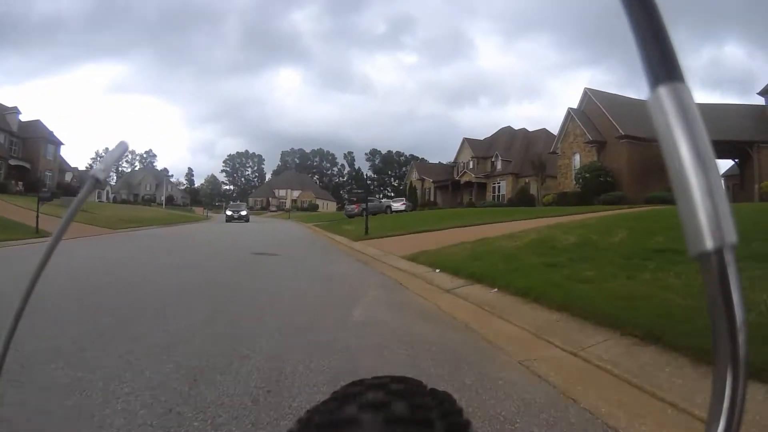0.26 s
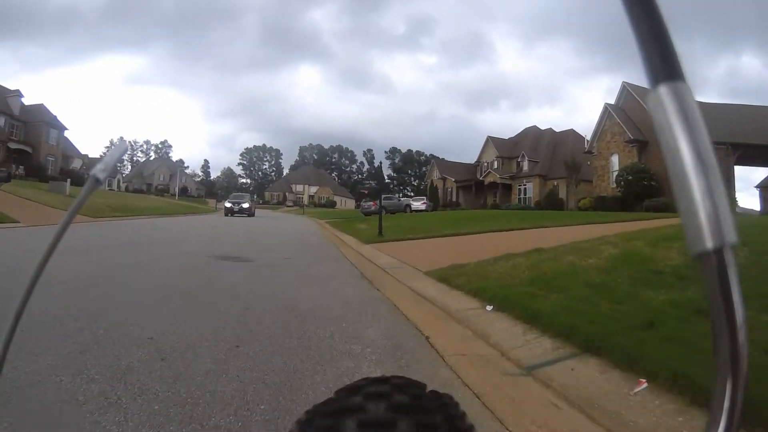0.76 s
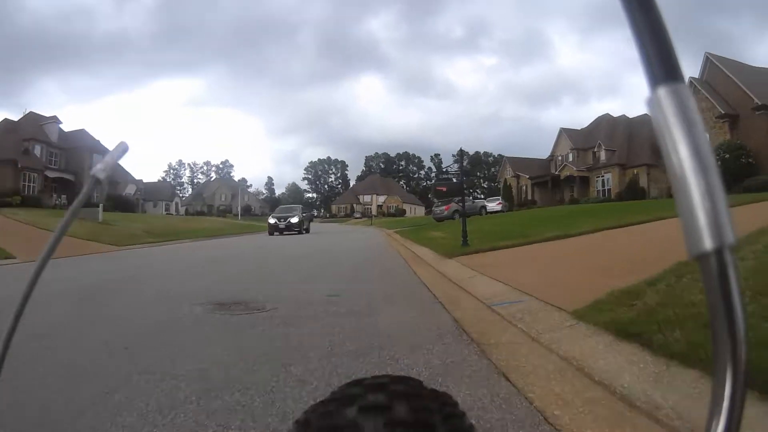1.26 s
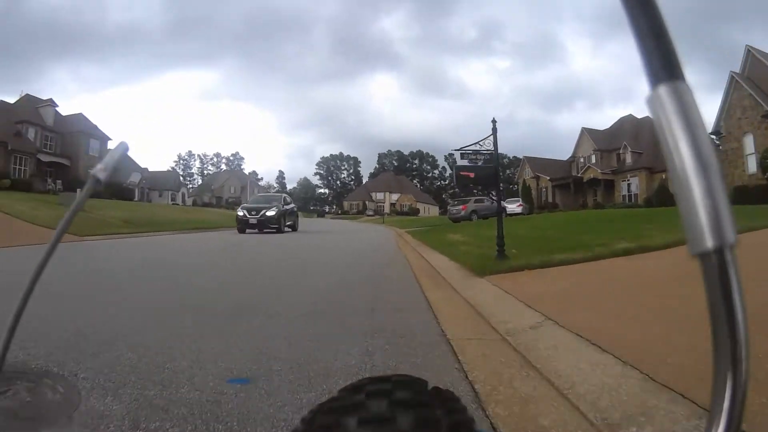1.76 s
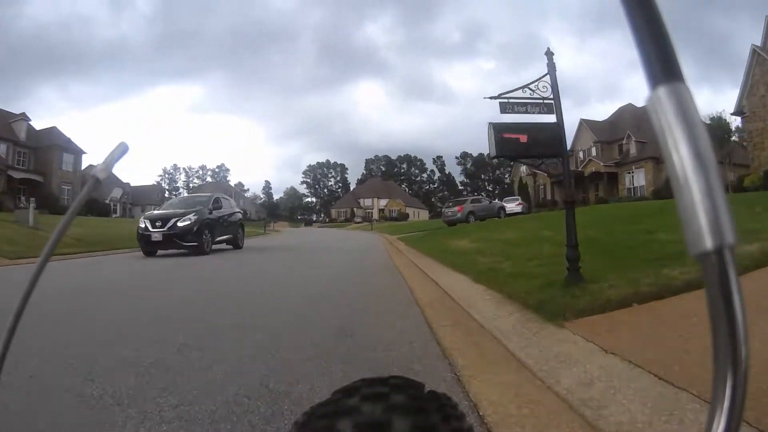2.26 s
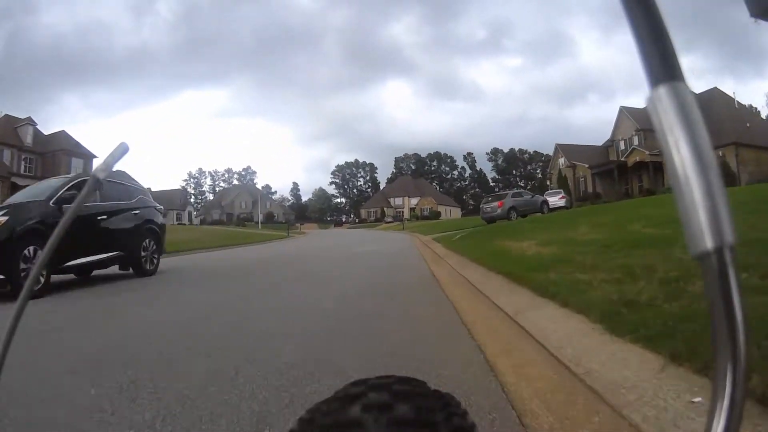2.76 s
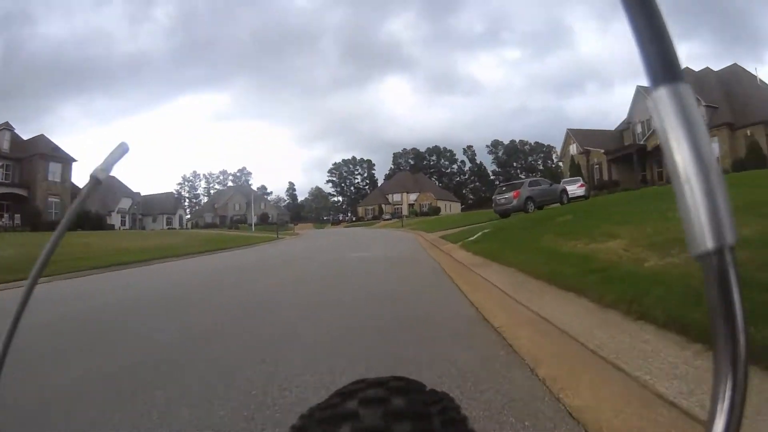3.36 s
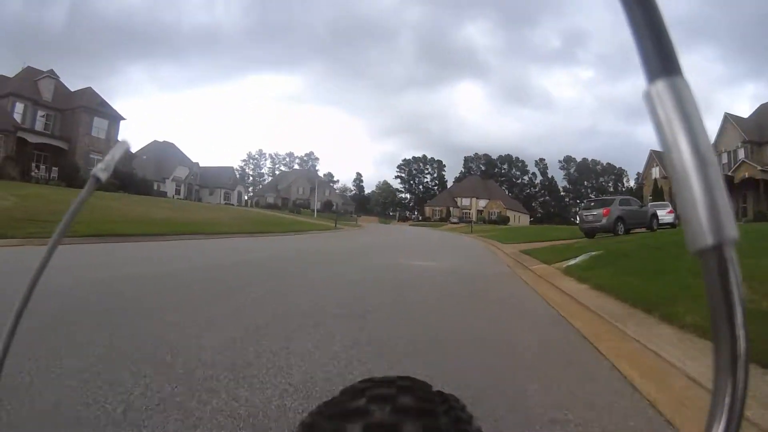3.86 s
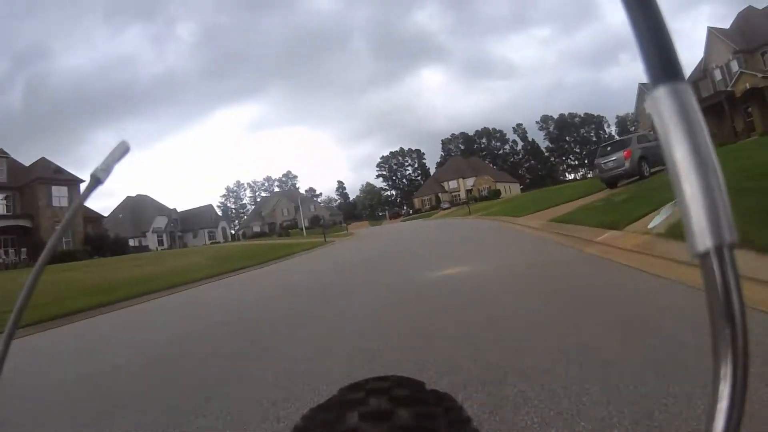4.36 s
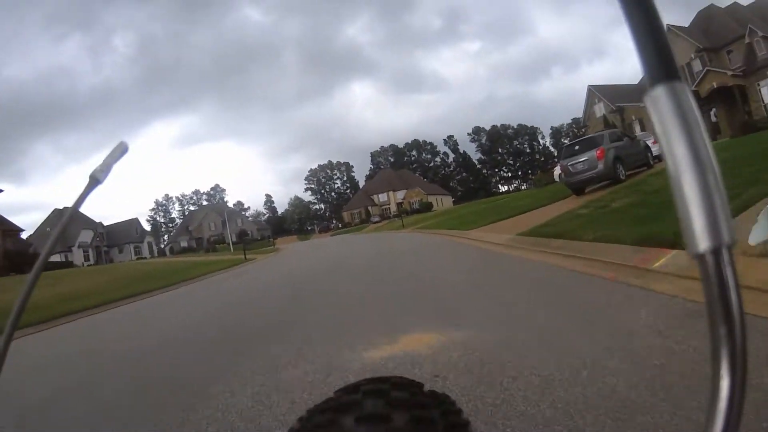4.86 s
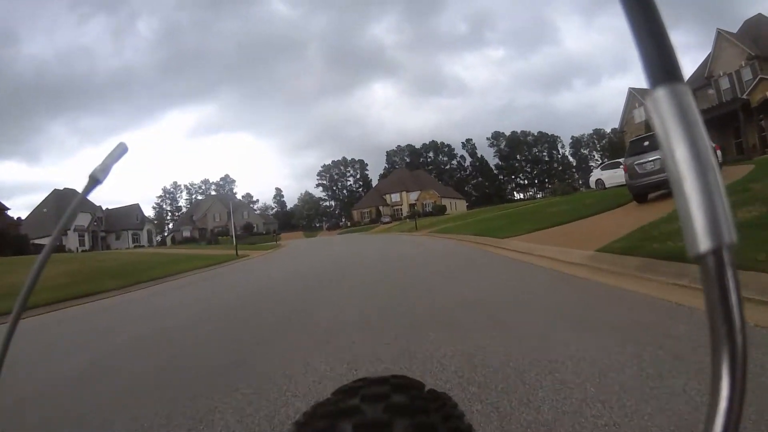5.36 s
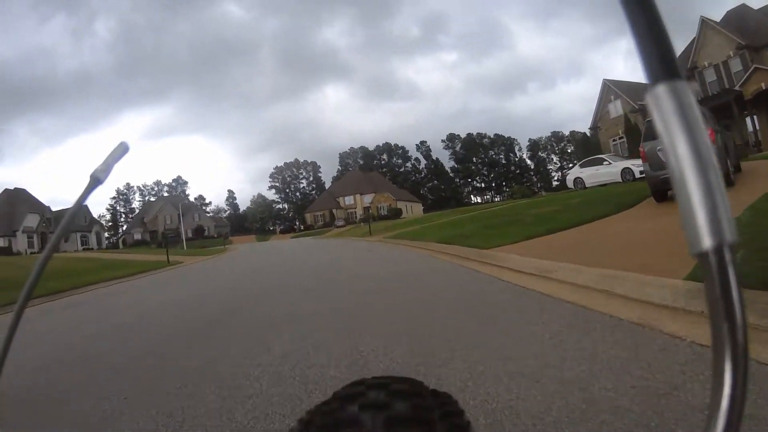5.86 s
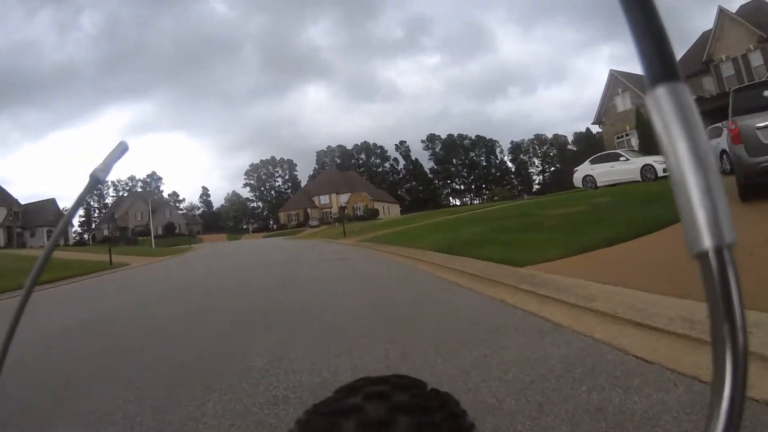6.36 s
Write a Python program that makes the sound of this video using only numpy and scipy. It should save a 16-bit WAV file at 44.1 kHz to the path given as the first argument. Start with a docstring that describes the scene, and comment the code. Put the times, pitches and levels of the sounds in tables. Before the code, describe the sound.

Outdoor ride heard from a bike-mounted microphone: buzzing tread hum that rises slightly with pedal pushes, grainy asphalt roar with fine hiss, and tiny metallic clinks about every 0.4 seconds. Light frame taps come just after two seconds, a passing car adds a brief airy swell, and later come wind buffets, two strong clacks and fading tyre noise.

```python
"""Bicycle with knobbly tyres on a suburban street

The microphone sits above the front wheel. Tread knobs hum as they slap the road, rising with each push on
the pedals. Random clicks, filtered, make the asphalt's roar and hiss; filtered noise in gusts and sharp
pressure swings make the wind. Filtered noise swells and fades as a car passes. Short decaying tones make a
loose part's rattle, once per wheel turn, and ticking cables; ringing modes and noise make the frame's knocks."""
import sys
import numpy as np
from scipy import signal
from scipy.fft import rfft, irfft
from scipy.io import wavfile

SR = 44100
rng = np.random.default_rng(int(sys.argv[2]) if len(sys.argv) > 2 else 0)


def to_wav(s):
    """Save 16-bit WAV."""
    ch = np.atleast_2d(s).T  # columns
    pcm = np.round(np.clip(ch, -1, 1) * 32767)  # PCM
    wavfile.write(sys.argv[1], SR, pcm.astype(np.int16))


N = 291942
T = np.arange(N) / SR  # time of every sample, s

# once a turn the wheel's high spot scuffs the road and a loose part rattles:
# start_s [s], scuff_db [dB change of road noise], rattle_db [dB]
WHEEL_TURNS = [(0.311, 1.5, -26.5), (0.689, -0.5, -49), (1.078, 0.5, -30.5), (1.455, 1.5, -28),
               (1.83, 1, -44), (2.233, 2, -28), (2.624, .5, -31), (3.041, 1, -42), (3.402, 3.5, -29),
               (3.75, -2, -38), (4.111, 2.5, -49.5), (4.486, 7.5, -28.5), (4.87, 4.5, -48), (5.226, 0, -35),
               (5.507, 5, -31), (5.88, -0.5, -42), (6.18, 1, -36), (6.542, 0, -43)]


def undb(db):
    """Turn decibels into a gain."""
    return 10 ** (np.asarray(db) / 20)


def curve(table, axis=1):
    """Join one column of a table by straight lines in time."""
    rows = np.array(table)
    return np.interp(T, rows[:, 0], rows[:, axis])


def unit(x):
    """Scale to an rms (average strength) of 1."""
    return x / np.sqrt(np.mean(x ** 2))


def colour(x, points):
    """Filter through (Hz, dB) points without sounding early; the overall power gain is 1."""
    hz, db = np.transpose(points)
    log_hz = np.log(np.fft.rfftfreq(N, 1 / SR) + 1)
    gain = undb(np.interp(log_hz, np.log(hz), db))
    # folding the cepstrum forward in time gives a filter that only looks back
    cepstrum = irfft(np.log(unit(gain)), N)
    cepstrum[1:N // 2] *= 2
    cepstrum[N // 2 + 1:] = 0
    response = np.exp(rfft(cepstrum))
    return irfft(rfft(x) * response, N)


def walk(rate_hz):
    """Wander smoothly at random, with rms 1 and movement up to about rate_hz."""
    hz = np.fft.rfftfreq(N, 1 / SR)
    smoothing = np.exp(-.5 * (hz / rate_hz) ** 2)
    return unit(irfft(rfft(rng.standard_normal(N)) * smoothing, N))


def decay(age, t60):
    """Die away exponentially, by 60 dB in t60 seconds."""
    return np.exp(-np.log(1000) * age / t60)


def fade(start, t60):
    """Start suddenly and die away exponentially."""
    age = T - start
    return (age >= 0) * np.exp(-np.log(1000) * np.clip(age / t60, 0, 2))


def bell(centre, half_s):
    """A smooth swell of height 1, down to about a third half_s away from its centre."""
    return np.exp(-np.minimum(((T - centre) / half_s) ** 2, 20))


def grains(per_s, spread_db):
    """Dense random clicks, mostly small and a few large."""
    hit = rng.random(N) < per_s / SR
    size = np.minimum(rng.exponential(size=N), 2 * np.e)
    sign = rng.choice([-1, 1], N)
    return unit(hit * sign * undb(spread_db * size))


def tread(hum_db=0.03, crown_db=-1.5, sway=0.19, flutter_db=2.5, uneven=0.18, crown_rough=0.48, slap=0.03):
    """Staggered knobs slap the road in pairs, so the hum sits at twice the knob rate."""
    # knobs meeting the road between pedal pushes: time_s [s], knob_rate_hz [Hz]
    coasting = [(0, 134.4), (.55, 134.2), (1.9, 136.8), (2.5, 137), (3.05, 132.6), (3.38, 134.5),
                (3.9, 140.4), (4.3, 139.5), (4.78, 146.2), (5.27, 141.1), (5.7, 138.7), (6.15, 143.2),
                (6.62, 144)]
    # pushes on the pedals: centre_s [s], rise_hz [Hz added to the knob rate]
    pushes = [(.31, 3.334), (.93, 3.866), (1.2, 3.12), (1.68, 3.929), (2.25, 2.54), (2.77, 4.95),
              (3.23, 6.03), (3.628, 11), (4.071, 9.5), (4.559, 6.76), (5.03, 12), (5.459, 16), (5.909, 10),
              (6.38, 12)]
    # how hard the tread sings: time_s [s], level_db [dB, before bounces and overall trim]
    hum_level = [(0, -14.5), (.6, -21), (.8, -21), (1.28, -19), (1.6, -22), (2.0, -19.5), (2.2, -25),
                 (2.52, -18.5), (2.72, -21), (3.0, -18), (3.23, -27), (3.58, -10.5), (3.9, -23),
                 (4.12, -11), (4.4, -16.5), (4.8, -21.5), (5.08, -26), (5.37, -18.5), (5.7, -27.5),
                 (6.2, -30.5), (6.62, -25)]
    # third harmonic, strong while the tyre runs upright on its crown: time_s [s], level_db [dB, before trim]
    crown_level = [(0, -23.5), (.9, -21.5), (1.3, -25.5), (1.55, -34.5), (1.8, -27.5), (2.4, -27.5),
                   (2.7, -29.5), (3.05, -24.5), (3.4, -32.5), (6.62, -42.5)]
    # weaker tread harmonics: multiple [times the knob rate], level_db [dB against the hum]
    weak_harmonics = [(1, -25), (4, -20.5), (5, -35), (6, -37.5)]
    # wheel bounces press the tread into the road:
    # centre_s [s], swell_db [dB], cycle_s [s from light to pressed to light again]
    bounces = [(.26, -1.5, 0.36), (.445, 8, 0.13), (0.621, 8.5, 0.2), (1.04, 4.5, 0.11), (1.29, 3, 0.33),
               (1.491, 0.5, .16), (1.8, 4.5, 0.17), (2.04, 7, 0.12), (2.235, 12, .18), (2.43, 6.5, .14),
               (2.88, 9, 0.07), (3.04, 7, 0.38), (3.398, 11.5, 0.22), (3.73, 6.5, 0.1), (4.47, 7, 0.2),
               (4.86, 8, 0.21), (4.985, 11, 0.092), (5.22, 3.5, 0.22), (5.495, 7.5, .12),
               (5.865, 10.5, .17), (6.19, 11, 0.094)]

    knob_hz = curve(coasting)
    for centre, rise_hz in pushes:
        knob_hz = knob_hz + rise_hz * bell(centre, .105)
    phase = 2 * np.pi * np.cumsum(knob_hz) / SR + sway * walk(18)  # sway in radians

    press_db = np.zeros(N)
    for centre, swell_db, cycle_s in bounces:
        swing = np.cos(2 * np.pi * (T - centre) / cycle_s)
        press_db += swell_db * bell(centre, 0.46 * cycle_s) * swing

    flutter = unit(undb(flutter_db * np.tanh(walk(20))))  # small bumps make the hum flutter
    # no two knobs land alike
    strength = 1 + uneven * walk(19) + slap * walk(70)
    hum = strength * np.sin(2 * phase + slap * walk(70))
    for multiple, db in weak_harmonics:
        hum = hum + undb(db) * (1 + .5 * walk(18)) * np.sin(multiple * phase + walk(6))
    crown = unit((1 + crown_rough * walk(17)) * np.sin(3 * phase + crown_rough * walk(6.3)))
    hum = flutter * unit(hum) * undb(curve(hum_level) + press_db + hum_db)
    return hum + crown * undb(curve(crown_level) + crown_db)


def asphalt(roar_db=2.5, hiss_db=13, scuff_s=0.035, scuff_lead_s=0.02):
    """Stones drum on the tyre casing and fine grit crackles as the rubber lifts."""
    # road noise: time_s [s], roar_db [dB, before trim], hiss_db [dB, before trim]
    road_level = [(0, -27, -59), (.6, -27.5, -59.5), (1.0, -26.5, -57.5), (1.5, -26, -59.5),
                  (2.3, -25.5, -57.5), (3.15, -26, -57), (3.6, -23, -55), (4.0, -24.5, -55),
                  (4.25, -26.5, -55.5), (4.7, -27.5, -59.5), (5.25, -30, -62), (5.43, -28, -57.5),
                  (5.65, -33.5, -64.5), (5.9, -29.5, -62.5), (6.1, -36.5, -68), (6.62, -37.5, -68.5)]
    # tyre casing and mount ringing to the road: pitch_hz [Hz], level_db [relative dB]
    roar_colour = [(60, -3.5), (140, -3), (220, -4.5), (320, 5), (420, 1.5), (570, -5), (690, -4),
                   (800, -4.5), (880, -5.5), (980, -13), (1300, -18), (2000, -27.5), (4000, -53.5)]
    # colour of the grit: pitch_hz [Hz], level_db [relative dB]
    hiss_colour = [(500, 8), (1100, 19.5), (1550, 9), (2100, 12.5), (2600, 9.5), (3700, 3.5), (5500, 0),
                   (7400, 0), (9000, -11)]

    stones, grit = grains(9000, 1.5), grains(12000, 3.0)
    roar_patches_db, grit_patches_db = .8 * walk(15), 1.1 * walk(25)
    # the high spot changes the road noise just before each rattle
    scuff_db = sum(db * bell(start - scuff_lead_s, scuff_s) for start, db, _ in WHEEL_TURNS)
    roar_level_db = curve(road_level) + roar_db + scuff_db + roar_patches_db
    hiss_level_db = curve(road_level, axis=2) + hiss_db + scuff_db + grit_patches_db
    roar = colour(stones, roar_colour) * undb(roar_level_db)
    hiss = colour(grit, hiss_colour) * undb(hiss_level_db)
    return roar + hiss


def wind(rumble_db=-4, eddy_db=-0.5, rebound=0.71, rebound_s=0.0072, churn_db=3.7):
    """Turbulence rumbles in gusts; strong eddies suck at the microphone, then pressure snaps back."""
    # colour of the rumble: pitch_hz [Hz], level_db [relative dB]
    wind_colour = [(10, -5), (25, 4.5), (55, 2), (100, -7), (185, -8), (300, -15), (500, -24),
                   (1000, -45.5), (3000, -64)]
    # gusts on the microphone: centre_s [s], level_db [dB, before trim], half_s [s, half length]
    gusts = [(0.312, -21, 0.099), (0.448, -22, 0.098), (0.598, -12, 0.058), (0.859, -23.5, 0.091),
             (1.278, -22, 0.14), (2.304, -22, .04), (2.737, -17.5, 0.027), (2.925, -24, 0.038),
             (3.26, -26, .05), (3.407, -8, .06), (3.621, -9, 0.051), (3.772, -7.5, 0.05), (4.001, -7, 0.04),
             (4.345, -19, 0.066), (4.53, -10.5, 0.14), (4.897, -14, 0.083), (5.42, -13.5, 0.038),
             (5.54, -9, .055), (5.7, -13, 0.051), (5.884, -9, 0.088), (6.03, -10.5, 0.064),
             (6.201, -11.5, 0.041), (6.293, -17.5, 0.026)]
    # strongest eddies: centre_s [s], suction_db [dB, before trim], half_s [s, half length]
    strong_eddies = [(0.289, -6, .0016), (0.314, -3.5, .002), (0.454, -4, 0.0047), (0.572, -7, 0.01),
                     (3.224, -3.5, 0.0018), (3.276, -4.5, 0.0046), (3.41, -8.5, 0.0015),
                     (3.477, -1.5, 0.0032), (3.797, -10.5, .0028), (4.528, -0.5, 0.0021),
                     (4.852, -2, 0.0026), (4.888, -3, 0.0012), (4.919, -8, 0.0038), (5.525, 3, .0013),
                     (5.551, 1.5, 0.0021), (5.569, -3, 0.0036), (5.824, -6.5, .0037), (5.89, -2, 0.001),
                     (6.036, -1.5, 0.0017), (6.19, -2, 0.0039)]

    breeze_db = -29 + 3.5 * T / T[-1]  # air between the gusts, growing along the ride
    air = undb(breeze_db) + sum(undb(db) * bell(centre, half_s) for centre, db, half_s in gusts)
    churn = unit(undb(churn_db * walk(48)))
    rumble = colour(rng.standard_normal(N), wind_colour) * churn

    eddies = np.zeros(N)
    for centre, db, half_s in strong_eddies:
        age = T - centre
        suction = 1 / (1 + (age / half_s) ** 2)
        # slides from 0 to 1 as the suction gives way to the rebound
        passed = .5 * (1 + np.tanh(3.0 * (age - half_s) / half_s))
        snap_back = rebound * np.exp(-np.minimum(np.abs(age - half_s) / rebound_s, 20))
        eddies += undb(db) * (passed * snap_back - (1 - passed) * suction)
    return undb(rumble_db) * air * rumble + undb(eddy_db) * eddies


def car(nearest_s=2.95, passing_s=0.25, car_db=-31.5):
    """Tyre noise of a passing car swells and fades as one over its distance."""
    # colour of the tyre noise: pitch_hz [Hz], level_db [relative dB]
    car_colour = [(80, -16), (300, 0.5), (900, 13), (1400, -1.5), (2300, -2), (3200, -11), (4500, -18.5),
                  (8000, -31)]
    distance = np.hypot(1, (T - nearest_s) / passing_s)  # 1 at the nearest point
    return colour(rng.standard_normal(N), car_colour) * undb(car_db) / distance


def clink(start, db, pitch_hz, rattle_s, click_t60=0.0031, bounce_db=-5, count=7):
    """A small metal part clicks, rings faintly and bounces; later bounces are weaker."""
    # faint ring of the metal: pitch_hz [Hz], level_db [dB against the click], t60_s [s to fall 60 dB]
    metal_modes = [(2600, -13, 0.03), (3460, -17, 0.032), (3920, -18.5, 0.037), (4400, -32.5, 0.067),
                   (5060, -25.5, .04), (6540, -22, .03)]
    out, age = np.zeros(N + SR), T[:SR // 20]
    contact = decay(age, click_t60) * np.sin(2 * np.pi * pitch_hz * age)
    for hz, mode_db, t60 in metal_modes:
        contact = contact + undb(mode_db) * decay(age, t60) * np.sin(2 * np.pi * hz * age)
    contact = undb(db) * contact

    for late in np.append(0, rng.random(count)):
        first = int((start + late * rattle_s) * SR)
        strength = 1
        if late:
            # a loose part bounces for longer and more strongly than a tight one
            strength = undb(bounce_db) * (1 - late / 2) * np.tanh(rattle_s / 0.005)
        out[first:first + len(age)] += strength * contact
    return out[:N]


def ticks():
    """A loose part rattles with each turn of the wheel; cables and chain tick as well."""
    # ticks of cables and chain: start_s [s], level_db [dB of the click tone], pitch_hz [Hz]
    cable_ticks = [(.296, -32, 4800), (.446, -34, 5560), (.911, -26, 3700), (3.651, -30, 5500),
                   (3.952, -26, 5730), (5.1, -29.5, 5600), (5.169, -40, 3600), (5.554, -29.5, 3980),
                   (6.287, -41, 4800), (6.381, -36.5, 6000)]
    rattles = sum(clink(start, db, 4600, rattle_s=.028) for start, _, db in WHEEL_TURNS)
    return rattles + sum(clink(start, db, hz, rattle_s=.0026) for start, db, hz in cable_ticks)


def knocks(body_db=-3, clack_db=-12.0, clack_t60=0.058, octaves=0.38, rise_s=.0015, tail_db=-17, tail_t60=0.26):
    """Blows ring the frame modes near their own pitch; on hard contact loose parts chatter, then settle."""
    # knocks of the frame and mount: start_s [s], level_db [dB, before trim],
    # pitch_hz [Hz that the blow favours], hard_db [dB of hard-contact clack against the blow, before trim]
    blows = [(2.113, -10, 750, -20), (2.295, -8, 604, -11.5), (3.608, -1, 730, -28.5),
             (3.7343, -5, 800, 1.5), (3.741, 2, 330, -7), (5.576, -10.5, 645, -31), (5.647, -11.5, 1600, 1),
             (5.649, 1.5, 293.4, -16), (5.65, -5.5, 1500, -9), (5.832, -12, 756, -27),
             (5.86, -18, 650, -17), (5.89, -23, 605, -7), (6.193, -12, 570, -10.5)]
    # ringing of the frame: pitch_hz [Hz], level_db [relative dB], t60_s [s to fall 60 dB]
    frame_modes = [(250, 5, 0.029), (358, -3, 0.055), (487, 10, 0.013), (642, 1, 0.023), (850, -1, 0.015),
                   (1020, -17, 0.065), (1305, -18, .09), (1450, -8.5, 0.032), (1550, -11.5, 0.05),
                   (1744, -15.5, .06), (1980, -10.5, 0.04), (2280, -14, .06), (2800, -12.5, 0.013),
                   (3240, -12.5, 0.029)]
    # colour of the chatter: pitch_hz [Hz], level_db [relative dB]
    clack_colour = [(300, 0.5), (900, 3), (1150, 1), (1600, -1.5), (2100, -9), (2700, -11.5), (3350, -13.5),
                    (4000, -24.5), (7500, -26.5), (9000, -40.5)]

    body, chatter, age = np.zeros(N), np.zeros(N), T[:SR // 10]
    for start, db, pitch_hz, hard_db in blows:
        first = int(start * SR)
        for k, (hz, mode_db, t60) in enumerate(frame_modes):
            favour = 1 / (1 + (np.log2(hz / pitch_hz) / octaves) ** 2)
            ring = decay(age, t60) * np.sin(2 * np.pi * hz * age)
            # neighbouring modes swing opposite ways
            body[first:first + len(age)] += (-1) ** k * undb(db + mode_db) * favour * ring
        rise = np.clip((T - start) / rise_s, 0, 1)
        settling = fade(start, clack_t60) + undb(tail_db) * fade(start, tail_t60)
        chatter += undb(db + hard_db) * rise * settling
    clack = colour(chatter * rng.standard_normal(N), clack_colour)
    return undb(body_db) * body + undb(clack_db) * clack


def scene():
    """Add everything up at the one microphone."""
    return (tread() + asphalt() + wind() + car() + ticks() + knocks())[None]


def record(dry):
    """Flatten any peaks beyond full scale, then cut the treble steeply above 8100 Hz."""
    low_pass = signal.butter(22, 8100, fs=SR, output="sos")
    return signal.sosfilt(low_pass, np.clip(dry, -1, 1))


dry = scene()
out = record(dry)
to_wav(out)
```